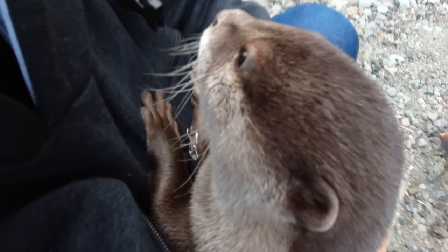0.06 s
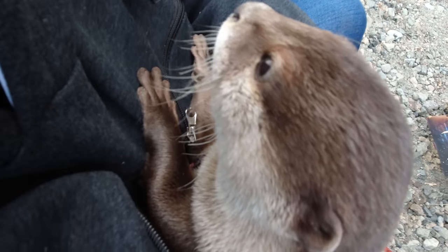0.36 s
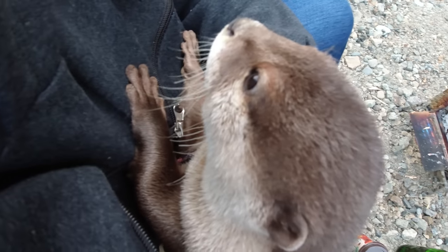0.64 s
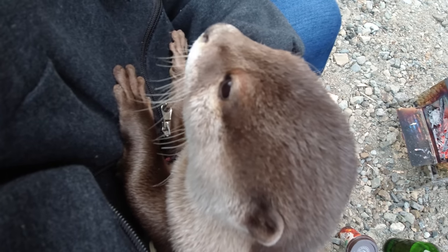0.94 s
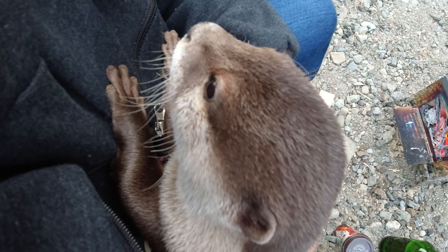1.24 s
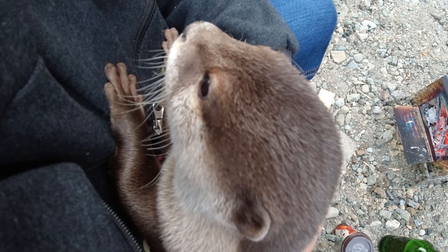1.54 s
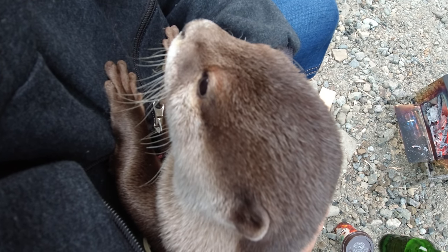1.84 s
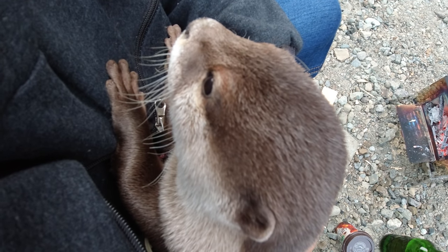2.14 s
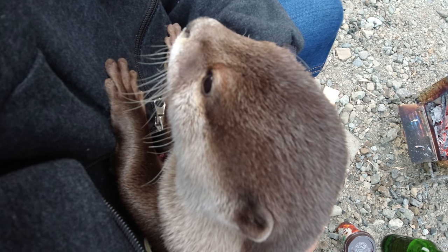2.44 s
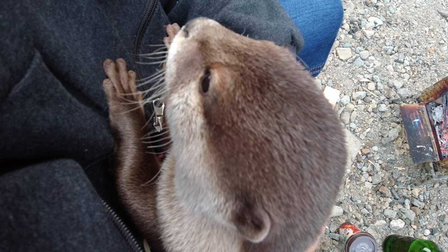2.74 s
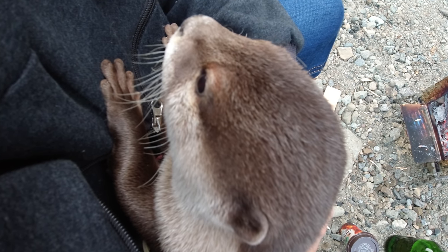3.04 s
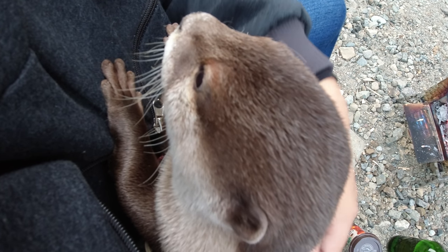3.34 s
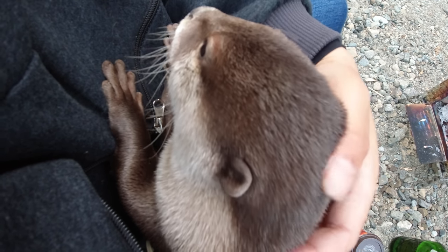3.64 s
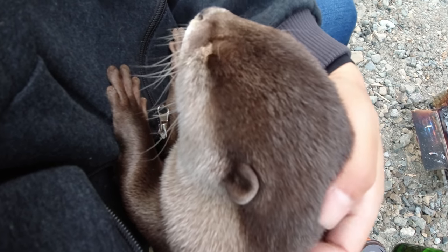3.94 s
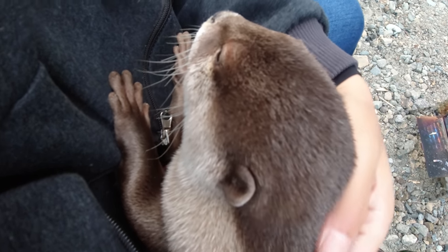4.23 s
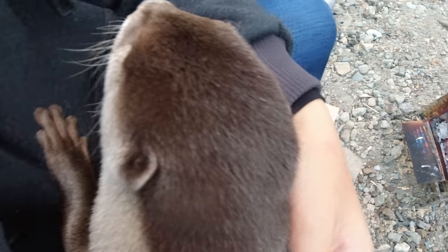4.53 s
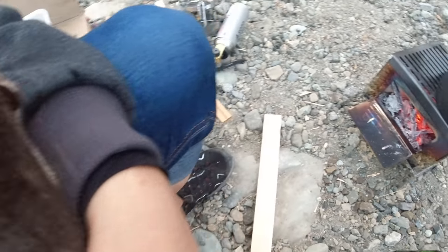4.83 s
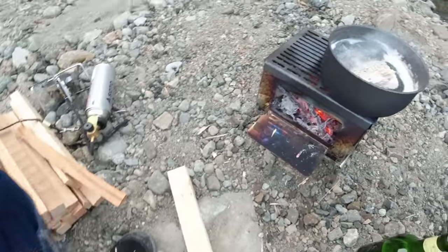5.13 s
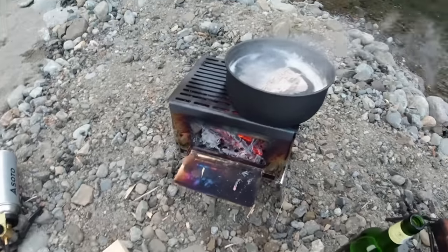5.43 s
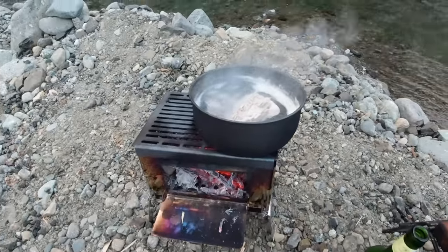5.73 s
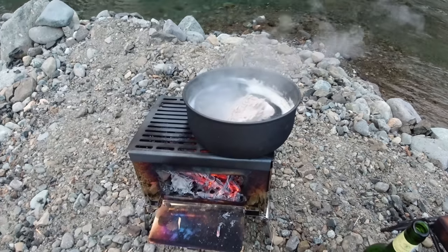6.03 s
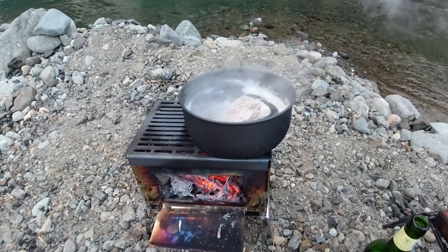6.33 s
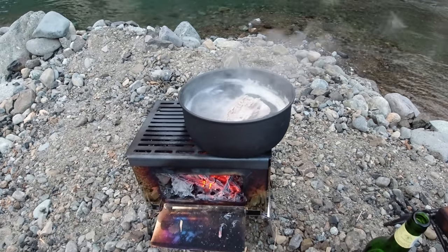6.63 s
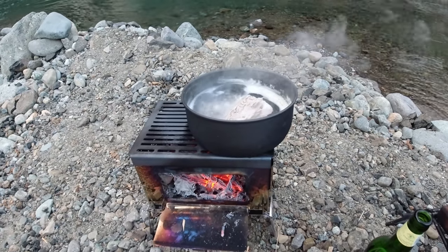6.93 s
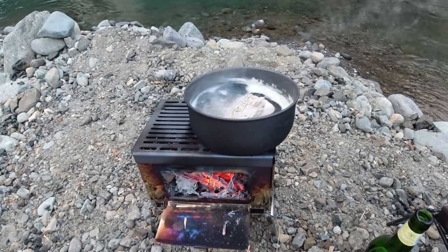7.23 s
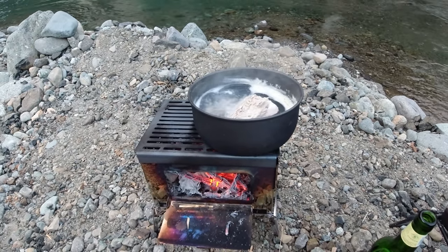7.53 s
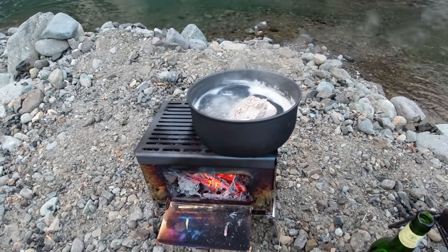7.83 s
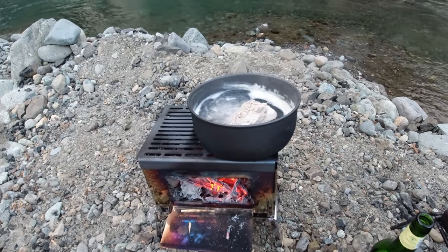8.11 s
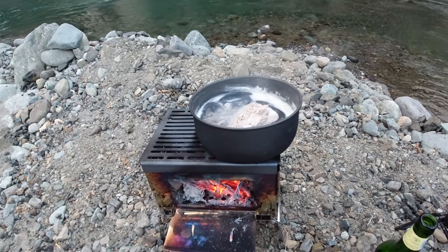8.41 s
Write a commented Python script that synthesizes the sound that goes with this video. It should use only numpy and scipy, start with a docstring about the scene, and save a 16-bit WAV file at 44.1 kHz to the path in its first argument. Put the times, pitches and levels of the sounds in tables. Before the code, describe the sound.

A soft cloth bump on the microphone, then a small otter whines right up close, outdoors beside a quietly rushing river. Two short squeals are followed by a longer one that breaks into a rattling growl. After a few light ticks come two quieter, hoarse squeals. Air rumbles gently on the microphone throughout, and toward the end a low hum and the barely audible hiss of a steaming pan join in.

```python
"""A gravel river bank: close by, a small otter on someone's lap begs with five whining squeals.
Its vocal folds clap through the throat; a squeal drops onto its pitch, swells and sags. The voice
cracks upward, turns raspy and, in the third squeal, slackens into a rattling growl. Behind it the
river rushes, air and clothing bump the microphone and a few dry ticks sound; a low hum and the
faint hiss of a steaming pan come up late."""
import sys
import numpy as np
from scipy import signal
from scipy.fft import rfft, irfft
from scipy.io import wavfile
from scipy.ndimage import uniform_filter1d, map_coordinates

SR = 44100
rng = np.random.default_rng(int(sys.argv[2]) if len(sys.argv) > 2 else 0)


def persist_wave(psi):
    """Save psi, clipped to +-1, as 16-bit WAV."""
    counts = np.round(np.clip(psi, -1, 1) * 32767).astype(np.int16)
    wavfile.write(sys.argv[1], SR, np.atleast_2d(counts).T)


N = 382347
TIME = np.arange(N) / SR

# One row a note; the last squeal is three notes run together:
# (start [s], end [s], yelp above the pitch [Hz], yelp decay [s], overtone level [dB],
#  swell depth [dB], swell [s], sag depth [dB], sag [s], fundamental level [dB], its fall [dB])
NOTES = [ (0.412, 0.862, 0.5, .01, -27, 11.5, 0.039, 9, .05, -33.5, 5),
         (2.465, 2.936, 101.5, 0.0099, -33.5, 7, .15, 1.5, .05, -36, -1.5),
         (3.563, 4.423, 240, 0.0095, -26, 18.5, 0.015, 6, .15, -31, 10.5),
         (5.572, 6.528, 620, 0.016, -36, 11.5, 0.087, 3.5, .3, -59, 9),
         (8.041, 8.265, 60, .015, -55.5, -15, 0.093, 0.5, .05, -53.5, -1.5),
         (8.252, 8.405, -0.5, .01, -49.5, 5, .03, 23, .022, -47.5, 2),
         (8.421, 8.68, 19.5, .015, -48, 17.5, 0.06, -5, .05, -45.5, -1)]
# The pitch line each note settles on: (time [s], pitch [Hz])
NOTE_PITCHES = [
    [(.43, 592), (.485, 577), (.525, 600), (.565, 574), (.79, 576.7), (.805, 560), (.86, 549.3)],
    [(2.54, 542.4), (2.655, 559), (2.725, 546), (2.755, 558.7), (2.79, 549.4), (2.92, 550.3)],
    [(3.6, 556.5), (3.635, 613.3), (3.68, 595.6), (3.83, 606.6), (4.02, 648), (4.06, 707), (4.31, 709.4),
     (4.35, 602)],
    [(5.615, 471), (5.647, 556), (5.74, 518.5), (5.9, 553.7), (5.95, 543.7), (6.1, 576.5), (6.17, 553),
     (6.3, 567.7), (6.45, 575)],
    [(8.09, 506.6), (8.18, 526.6), (8.24, 500.3)],
    [(8.26, 507), (8.34, 525.6), (8.39, 491)],
    [(8.47, 527.4), (8.53, 560.5), (8.67, 596)],
]
# Throat and mouth colour of each note: (frequency [Hz], gain [dB])
THROAT_COLOURS = [
    [(800, -5), (1170, -9.5), (1450, -13), (1750, -6), (2340, 0), (2930, -5.5), (3500, -21), (4100, -11.5),
     (4680, -12), (5260, -19.5), (5850, -11.5), (7600, -20), (8700, -40), (9350, -51)],
    [(800, 1.5), (1100, 0), (1650, -7), (2200, 2), (2450, 3.5), (2760, 0), (3300, -12), (4400, -10),
     (4960, -4), (6060, -11.5), (7300, -12), (8100, -83)],
    [(880, 4), (1200, -1.5), (1500, -7), (1800, -4), (2100, 1.5), (2400, -4), (3000, -0.5), (3650, -10),
     (4100, -22.5), (4850, -7), (6600, -20.5), (7500, -15.5), (8500, -35), (9300, -37.5)],
    [(700, -10.5), (850, 0.5), (1060, -2.5), (1150, 0), (1600, 6), (1730, -0.5), (2120, 7), (2300, 2),
     (2650, -4.5), (3200, -21.5), (3750, -20), (4150, -22.5), (4750, -18), (5250, -13.5), (6200, -22.5),
     (7500, -59)],
    [(1030, -7), (1550, 0.5), (2060, 1.5), (2300, -0.5), (2570, -11), (3090, -1), (3600, -24), (4120, -22),
     (4620, -7), (5200, -49)],
    [(1030, 7), (1550, -2), (2060, -12), (2580, -20), (3100, -9.5), (3600, -25), (4700, -30), (5500, -49)],
    [(850, -2.5), (1150, 3), (1500, -10), (1750, -12.5), (2000, -3), (2300, -1.5), (2740, -16), (3400, -24),
     (4900, -15.5), (5800, -52)],
]
# The voice cracks into a higher register: (start [s], length [s], jump [Hz])
CRACKS = [(.40, 0.031, 131), (2.45, 0.086, 63.6), (2.549, 0.022, 71.2), (2.585, 0.013, 44.4),
          (2.612, 0.0163, 35.4), (2.923, .03, 46.3), (5.808, 0.056, 28.9), (8.03, .05, 48.3)]
# Small upward quavers: (time [s], rise [Hz])
QUAVERS = [(.652, 28), (.715, 26.4), (.757, 19), (.79, 16.4), (3.611, 30.3), (3.807, 25)]
# The folds beat unsteadily: (start [s], length [s], period doubling [0-1], added roughness [0-1])
RASPS = [(.435, 0.068, 0, 0.15), (2.47, 0.37, 0.03, 0.06), (3.695, 0.16, 0.26, .06),
         (3.84, 0.53, 0.29, 0.21), (4.33, 0.075, 0.53, 0.2), (5.865, .12, .3, 0.09),
         (5.985, 0.16, 0.36, 0.3), (6.14, 0.042, 0.62, 0.02), (6.19, 0.029, .48, 0.32),
         (6.22, 0.098, .24, 0.04), (6.33, 0.14, 0.45, 0.1), (8.04, .05, 0.1, 0.24), (8.11, 0.23, 0, 0.13),
         (8.59, .1, .8, .2)]
# The voice catches: (time [s], dip [dB])
CATCHES = [(2.54, 3), (4.03, 6.5), (4.126, 3.5), (5.62, 4.5), (8.15, 7), (8.425, 5)]
# The growl slows to a rattle and picks up: (time [s], free slap rate [1/s], unevenness [0-1])
GROWL_PACE = [(3.842, 410, 0), (3.907, 427, 0.09), (4.0, 420, .1), (4.05, 330, .3), (4.1, 240, .3),
              (4.138, 145, 0.02), (4.213, 112, 0.03), (4.315, 120, 0.01), (4.355, 240, 0.08)]
# Throat colour of the growl: (frequency [Hz], gain [dB])
GROWL_COLOUR = [(60, -37), (130, -20), (200, -3.5), (400, -12.5), (520, -15), (800, -1), (1100, -9.5),
                (1350, -1), (1700, -12), (2200, 2), (2750, -6), (3350, -4.5), (4050, -27), (5200, -20),
                (6400, -54), (7600, -36.5), (9300, -67)]
# The throat rings on after each slap: (frequency [Hz], width [Hz], gain [dB])
GROWL_MODES = [(878.4, 36, 7), (2430, 360, -19), (5330, 190, 9)]
# Thin whistles over the voice: (start [s], length [s], frequency [Hz], level [dB])
WHISTLES = [(.455, 0.047, 4240, -46), (.56, 0.24, 14900, -76), (0.641, .035, 6500, -57),
            (0.765, 0.074, 5270, -41), (2.65, 0.035, 6100, -49), (3.708, 0.08, 4840, -34.5),
            (3.788, 0.051, 4310, -37.5), (3.888, 0.14, 4280, -45.5)]
# Where otter and river sit; the river shifts as the microphone turns: (time [s], left lead [ms])
OTTER_BEARING = [(.6, 0.078), (2.7, 0.073), (3.6, 0.081), (8.1, 0.082), (8.6, 0.039)]
RIVER_BEARING = [(4.6, 0.036), (6.3, 0.14)]
# Colours of the noise layers: (frequency [Hz], half-octave band gain [dB])
THUD_COLOUR = [(20, 10.5), (45, -6), (95, -0.5), (160, -18), (300, -38)]
CLOTH_COLOUR = [(150, -23), (400, 6.5), (550, -3.5), (700, -5), (1100, -28), (3000, -32)]
RIVER_COLOUR = [(100, 0), (140, -0.5), (195, -0.5), (330, 2.5), (520, -4), (800, -3), (1150, -7),
                (1700, -9), (3000, -15.5), (4700, -19), (6000, -61.5), (7000, -45), (9400, -57.5)]
RUMBLE_COLOUR = [(12, -31), (20, 3), (54, 0.5), (86, -3.5), (112, -1.5), (200, -6.5), (260, -42),
                 (440, -120)]
PAN_COLOUR = [(5000, -4), (7000, -8), (10000, -9), (13000, -11.5)]
# Fader rides of the background: (time [s], level [dB])
RIVER_LEVEL = [(0, -56.5), (.9, -54.5), (3.7, -53), (4.6, -57), (5.4, -59), (5.9, -57.5), (7.9, -56.5),
               (8.67, -52.5)]
RUMBLE_LEVEL = [(0, -57.5), (1, -62.5), (3.6, -54.5), (4.1, -68.5), (5.8, -65), (8, -60.5)]
HUM_LEVEL = [(0, -92), (5.6, -69), (6.3, -63.5), (7.2, -63.5), (7.7, -56.5), (8.67, -57)]
PAN_LEVEL = [(0, -102), (5.4, -102), (5.9, -83), (8.67, -91.5)]
# The noise layers widen toward the treble: (frequency [Hz], left-right likeness [0-1])
STEREO_LIKENESS = [(60, 0.62), (140, 1), (320, 1), (730, 0.96), (1670, 0.82), (3850, 0.34), (8850, 0.13)]
# Faint dry ticks: (time [s], peak before the boost [dB], ring [Hz])
TICKS = [(4.642, -53, 1750), (4.8728, -48, 2280), (4.8943, -54, 1860), (4.9474, -51, 1570),
         (5.041, -49, 1510)]

GROWL_START_S, GROWL_END_S = GROWL_PACE[0][0], GROWL_PACE[-1][0]


def otter(takeover_s=0.078, release_s=0.032, base_roughness=0.036):
    """Whine and growl share one breath, crossfading as the folds go slack."""
    doubling, rough = np.clip(stretches(RASPS, edge_s=0.011), 0, 1)
    jump_hz = stretches(CRACKS, edge_s=0.006)[0] + blips(QUAVERS, width_s=0.011)
    whines = sum(whine(*gesture(note, pitch, jump_hz), throat, doubling, base_roughness + rough)
                 for note, pitch, throat in zip(NOTES, NOTE_PITCHES, THROAT_COLOURS))
    takeover = 1 - np.exp(-np.maximum(TIME - GROWL_START_S, 0) / takeover_s)
    growl_share = takeover * np.clip((GROWL_END_S - TIME) / release_s, 0, 1)
    voice = np.sqrt(1 - growl_share) * whines + np.sqrt(growl_share) * growl()
    voice *= from_db(-blips(CATCHES, width_s=0.0099))
    voice = steep_top(voice, 9500) + whistles()
    return two_ears([voice, voice], in_time(OTTER_BEARING)[0])


def gesture(note, pitch, jump_hz, mouth_open_s=0.07, crack_db_per_hz=0.0436):
    """A note yelps down onto its pitch; the mouth opens and the overtones swell and sag."""
    start, end, yelp_hz, yelp_s, db, swell_db, swell_s, sag_db, sag_s, fundamental_db, fall_db = note
    age = np.clip(TIME - start, 0, end - start)
    hz = in_time(pitch)[0] + jump_hz + yelp_hz * np.exp(-age / yelp_s)
    mouth = 1 - np.exp(-age / mouth_open_s)
    over_db = db - swell_db * np.exp(-age / swell_s) - sag_db * np.exp((age + start - end) / sag_s)
    low_db = fundamental_db - fall_db * age / (end - start) + crack_db_per_hz * jump_hz
    over_gain = from_db(over_db) * held(start, end, overhang_s=0)
    low_gain = from_db(low_db) * held(start, end, overhang_s=0.0061)
    return hz, mouth, over_gain, low_gain


def whine(hz, mouth, over_gain, low_gain, throat, doubling, rough,
          waver=0.003, jitter=0.097, shimmer=0.79, limp=0.16, breath_db=-29, subharmonic_db=-11):
    """The folds clap once a cycle; under strain the beat is uneven, every second clap weak and late."""
    sounding = over_gain > 0
    hz = hz * (1 + waver * drift(45))
    cycles = np.cumsum(hz) / SR
    at = np.flatnonzero((np.diff(np.floor(cycles)) > 0) & sounding[1:])
    offbeat = np.arange(len(at)) % 2 * doubling[at]
    late, strong = rng.standard_normal((len(at), 2)).T
    delay_cycles = np.ceil(cycles[at]) - cycles[at] + limp * offbeat + jitter * rough[at] * late
    sizes = (1 - offbeat) * np.exp(shimmer * rough[at] * strong)
    claps = pulses(TIME[at] + delay_cycles / hz[at], sizes)
    folds_open = (1 + np.cos(2 * np.pi * cycles)) * sounding
    breath = from_db(breath_db) * np.sqrt(hz / SR) * rng.standard_normal(N) * folds_open
    voiced = butter(tract(claps + breath, throat), 723, "high", order=8)
    muffled = resonate(voiced, 2080, width_hz=1300)  # all that a closed mouth lets out
    overtones = evened(mouth * voiced + (1 - mouth) * muffled, size=700)
    subharmonic = from_db(subharmonic_db) * doubling * np.sin(np.pi * cycles)
    low_tone = np.sqrt(2) * (np.sin(2 * np.pi * cycles) + subharmonic)
    return over_gain * overtones + low_gain * low_tone


def growl(start_db=-26, sag_db_per_s=10.5, chest_db=-54):
    """The slaps of slack folds ring the throat, and the chest adds low body."""
    slaps = fold_slaps(slap_times())
    voiced = tract(slaps, GROWL_COLOUR)
    ringing = sum(from_db(db) * resonate(voiced, hz, width) for hz, width, db in GROWL_MODES)
    chest = resonate_twice(slaps, 190.2, width_hz=52)
    level_db = start_db - sag_db_per_s * np.maximum(TIME - GROWL_START_S, 0)
    throat = from_db(level_db) * evened(voiced + ringing, size=1100)
    return throat + from_db(chest_db) * evened(chest, size=2200)


def slap_times(ring_hz=845, pull=0.596):
    """The growl's uneven beat: the ringing throat pulls each gap toward a whole number of its cycles."""
    rate, uneven = in_time(GROWL_PACE)
    times, t = [], GROWL_START_S
    for chance in rng.standard_normal(300):
        if t < GROWL_END_S:
            times.append(t)
            now = int(t * SR)
            cycles = ring_hz * np.exp(uneven[now] * chance) / rate[now]
            t += (cycles + pull * (max(round(cycles), 1) - cycles)) / ring_hz
    return np.array(times)


def fold_slaps(times, rebound_s=0.00135, rebound=0.48, rasp=0.029, limp=0.73, hits=3):
    """Each slap of the folds dies away in quick rebounds and a puff of noise."""
    strong, late, springy = rng.standard_normal((len(times), 3)).T
    gaps = np.diff(times, append=times[-1] + 1)
    room = np.clip(gaps / rebound_s - 1, 0, hits)  # the next slap cuts the rebounds short
    weak = (np.arange(len(times)) % 2) * (room < 1)  # fast slaps alternate strong and weak
    sizes = from_db(strong) * (1 - limp * weak)
    bounce = np.clip(rebound * from_db(2 * springy), 0, 1)
    slaps = 0
    for k in range(hits):
        hit_times = times + k * rebound_s * (1 + 0.067 * late)
        slaps += pulses(hit_times, sizes * bounce ** (k * k) * np.clip(room - k + 1, 0, 1))
    puffs = signal.lfilter([1], [1, -np.exp(-1 / (0.0039 * SR))], slaps)
    return slaps + rasp * rng.standard_normal(N) * puffs


def whistles(width_hz=260):
    """Air whistles hoarsely through narrow resonances of the tight throat."""
    air = rng.standard_normal(N)
    return sum(from_db(db) * gate(start, start + length, fade_s=0.0092)
               * unit_rms(resonate_twice(air, hz, width_hz)) for start, length, hz, db in WHISTLES)


def scatter(voice, jacket_db=-17, jacket_s=0.014, gravel_db=-27, gravel_t60_s=0.28):
    """The jacket throws back a first spray of echoes, the stones a brief, faint tail."""
    t = TIME[:SR // 4]
    gravel = butter(rng.standard_normal((2, len(t))), 7000, "low", order=2)
    gravel *= from_db(-60 * t / gravel_t60_s) * (t > 0.003)
    jacket = butter(rng.standard_normal((2, len(t))) * np.exp(-t / jacket_s), 2100, "high", order=2)
    echoes = sum(from_db(db) * echo / np.sqrt(np.sum(echo ** 2) / 2)
                 for db, echo in [(gravel_db, gravel), (jacket_db, jacket)])
    return signal.oaconvolve(voice, echoes, axes=1)[:, :N]


def bump():
    """A soft thud on the microphone with a rub of cloth."""
    thud = rise_and_fall(peak_s=0.23, peak_db=-39.5, rise_db_per_s=53, fall_db_per_s=283)
    rub = rise_and_fall(peak_s=0.25, peak_db=-50, rise_db_per_s=55, fall_db_per_s=126)
    return thud * noise_bed(THUD_COLOUR, flicker_db=1) + rub * noise_bed(CLOTH_COLOUR, flicker_db=3)


def ticks(boost_db=2):
    """Dry handling ticks, each a click with one short ring."""
    out = 0
    for time, db, hz in TICKS:
        click = pulses(np.array([time]), np.ones(1))
        ring = butter(resonate(click, hz, width_hz=470), 5000, "low")
        out += from_db(db + boost_db) * ring / ring.max()
    return out


def river():
    """Rushing water: a broad, flickering wash, a little to the left."""
    water = noise_bed(RIVER_COLOUR, flicker_db=2)
    return fader(RIVER_LEVEL) * two_ears(water, in_time(RIVER_BEARING)[0])


def air_rumble():
    """Moving air buffets the microphone."""
    return fader(RUMBLE_LEVEL) * noise_bed(RUMBLE_COLOUR, flicker_db=4)


def low_hum():
    """A narrow band of noise wavers as a hum, reaching the left ear first."""
    hum = fader(HUM_LEVEL) * unit_rms(resonate_twice(rng.standard_normal(N), 81.7, width_hz=17))
    return two_ears([hum, hum], lead_ms=1.1)


def steaming_pan():
    """Steam hisses faintly in the high treble."""
    return fader(PAN_LEVEL) * noise_bed(PAN_COLOUR, flicker_db=1)


def noise_bed(colour, flicker_db):
    """Unit-power stereo noise in half-octave bands, each with its own flicker and width."""
    out, edges = 0, 20 * 2 ** np.arange(0, 9.6, 0.5)
    white = rng.standard_normal((2, 2, N))
    for k, (low, high) in enumerate(zip(edges, edges[1:])):
        hz = np.sqrt(low * high)
        if colour[0][0] < hz < colour[-1][0]:
            mid, side = butter(white[k % 2], [low, high], "band", order=2)
            alike = at_hz(STEREO_LIKENESS, hz)
            gain = from_db(at_hz(colour, hz) + flicker_db * drift(10.7))
            out += gain * (np.sqrt(1 + alike) * mid + np.sqrt(1 - alike) * side * [[1], [-1]])
    return unit_rms(out)


def from_db(db):
    """Decibels to gain."""
    return 10 ** (np.asarray(db) / 20)


def unit_rms(x):
    """Scale to unit power."""
    return x / np.sqrt(np.mean(x ** 2) + 1e-20)


def in_time(rows):
    """Each column of a curve, sample by sample."""
    times, *columns = np.transpose(rows)
    return [np.interp(TIME, times, column) for column in columns]


def fader(levels):
    """Gain that follows a level curve."""
    return from_db(in_time(levels)[0])


def at_hz(points, hz):
    """Read a spectrum on a log-frequency axis."""
    frequencies, values = np.transpose(points)
    return np.interp(np.log(hz), np.log(frequencies), values)


def gate(start, end, fade_s):
    """Open between two times, with short ramps."""
    return np.clip(np.minimum(TIME - start, end - TIME) / fade_s, 0, 1)


def held(start, end, overhang_s, attack_s=0.014, release_s=0.011):
    """Rounded attack, hold and release; the overhang starts it sooner and lets it linger."""
    attack = (TIME - start + overhang_s) / (attack_s + overhang_s)
    release = (end + overhang_s - TIME) / (release_s + overhang_s)
    return np.sin(np.pi / 2 * np.clip(np.minimum(attack, release), 0, 1)) ** 2


def stretches(rows, edge_s):
    """Each value of (start, length, values..) rows, held while its row lasts and zero between."""
    return sum(np.outer(values, gate(start - edge_s / 2, start + length + edge_s / 2, edge_s))
               for start, length, *values in rows)


def blips(rows, width_s):
    """A brief bell-shaped swing for each (time, size) row."""
    return sum(size * np.exp(-((TIME - time) / width_s) ** 2) for time, size in rows)


def rise_and_fall(peak_s, peak_db, rise_db_per_s, fall_db_per_s):
    """Gain that climbs to a peak and dies away."""
    age = TIME - peak_s
    return from_db(peak_db - np.maximum(-rise_db_per_s * age, fall_db_per_s * age))


def drift(rate_hz, step=20, settle=4000):
    """A smooth random wander of spread 1."""
    r = np.exp(-2 * np.pi * step * rate_hz / SR)
    slow = signal.lfilter([1], [1, -2 * r, r * r], rng.standard_normal(N // step + settle + 2))[settle:]
    return np.interp(np.arange(N) / step, np.arange(len(slow)), unit_rms(slow))


def pulses(times, sizes):
    """Band-limited clicks at exact times."""
    out, at = np.zeros(N), times[:, None] * SR
    taps = np.floor(at).astype(int) + np.arange(-3, 5)
    clicks = sizes[:, None] * np.sinc(taps - at) * np.sinc((taps - at) / 4)
    np.add.at(out, np.clip(taps, 0, N - 1), clicks)
    return out


def butter(x, hz, kind, order=4):
    """Smooth low-, high- or band-pass."""
    return signal.sosfilt(signal.butter(order, hz, kind, fs=SR, output="sos"), x + 1e-18)


def steep_top(x, hz):
    """Steep low-pass."""
    return signal.sosfilt(signal.ellip(10, 0.05, 80, hz, fs=SR, output="sos"), x)


def resonate(x, hz, width_hz):
    """One resonance with a peak gain of 1."""
    r = np.exp(-np.pi * width_hz / SR)
    feedback = [1, -2 * r * np.cos(2 * np.pi * hz / SR), r * r]
    return signal.lfilter(np.array([1, 0, -1]) * (1 - r * r) / 2, feedback, x + 1e-18)


def resonate_twice(x, hz, width_hz):
    """A resonance, then one twice as wide to steepen its skirts."""
    return resonate(resonate(x, hz, width_hz), hz, 2 * width_hz)


def tract(x, colour, size=2048):
    """The vocal tract as a minimum-phase filter of the given colour."""
    hz = np.maximum(np.fft.rfftfreq(size, 1 / SR), 1)
    cepstrum = irfft(np.log(from_db(at_hz(colour, hz))))
    cepstrum[1:size // 2] *= 2
    cepstrum[size // 2 + 1:] = 0
    return signal.oaconvolve(x, irfft(np.exp(rfft(cepstrum))))[:len(x)]


def evened(x, size):
    """Hold the short-time power near one; size is the window in samples."""
    power = uniform_filter1d(uniform_filter1d(x * x, size), size)
    return x / np.sqrt(np.maximum(power, 0) + 1e-4 * power.max())


def two_ears(pair, lead_ms):
    """The left side hears a sound slightly sooner than the right."""
    lead = lead_ms * SR / 1000
    return np.array([map_coordinates(x, [np.arange(N) + side * lead / 2], order=3)
                     for x, side in zip(pair, (1, -1))])


def scene():
    """The otter up front, the bank all around."""
    voice = otter()
    return voice + scatter(voice) + river() + air_rumble() + low_hum() + steaming_pan() + bump() + ticks()


def record(dry):
    """A steep high cut on the whole mix."""
    return steep_top(dry, hz=15800)


dry = scene()
out = record(dry)
persist_wave(out)
```